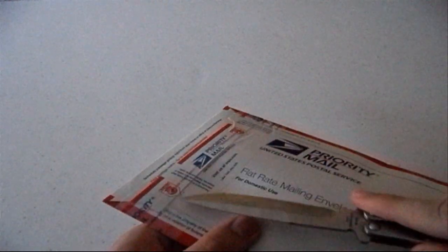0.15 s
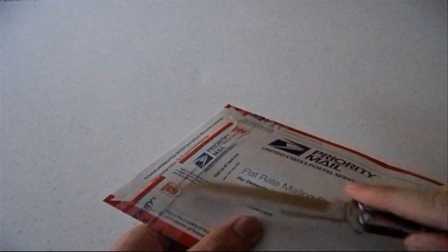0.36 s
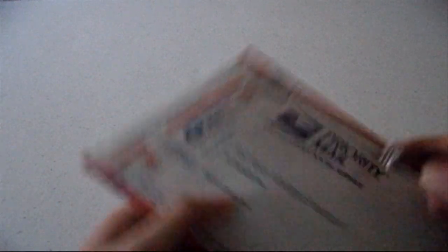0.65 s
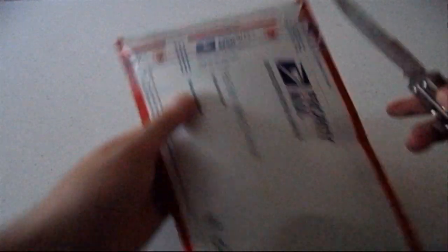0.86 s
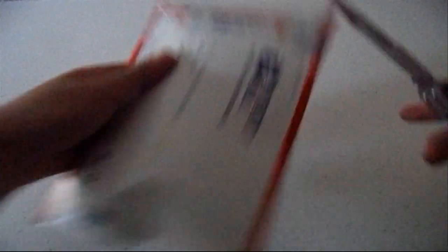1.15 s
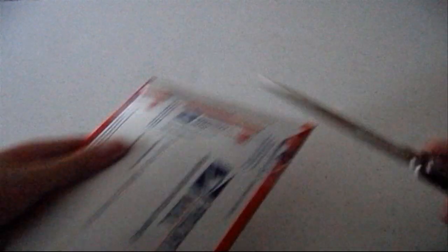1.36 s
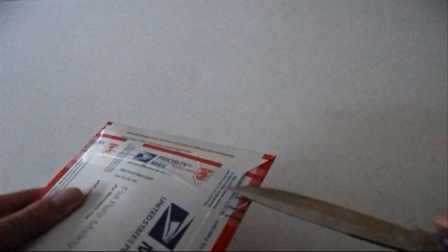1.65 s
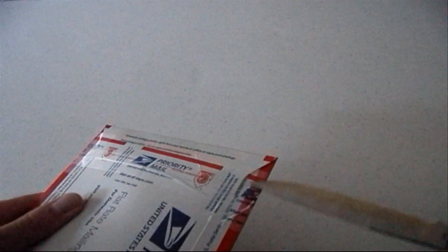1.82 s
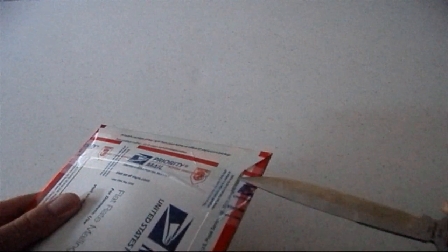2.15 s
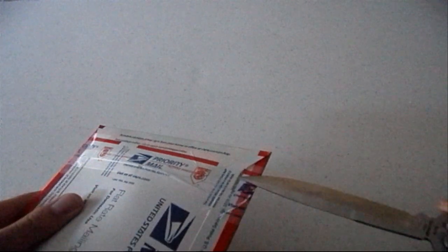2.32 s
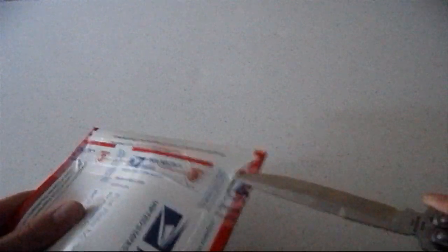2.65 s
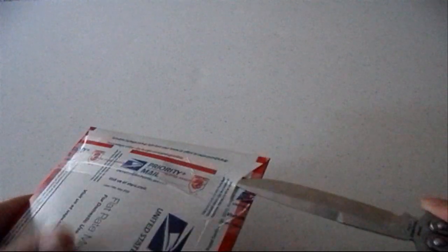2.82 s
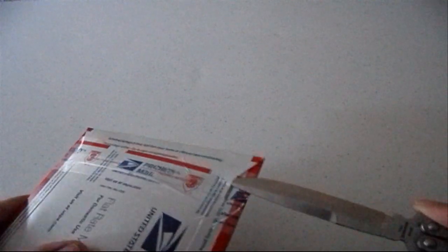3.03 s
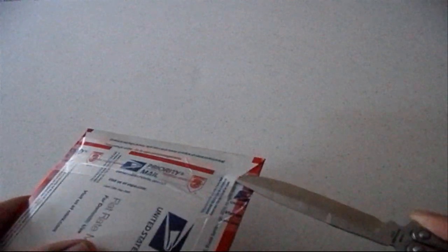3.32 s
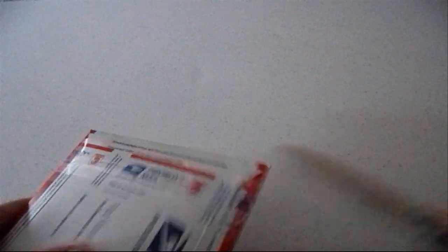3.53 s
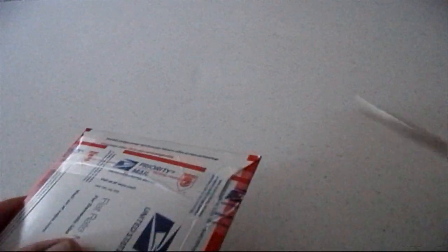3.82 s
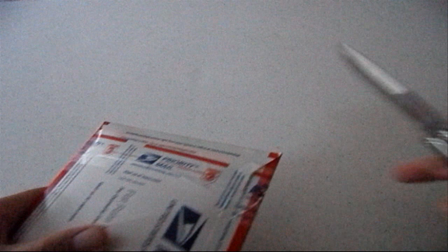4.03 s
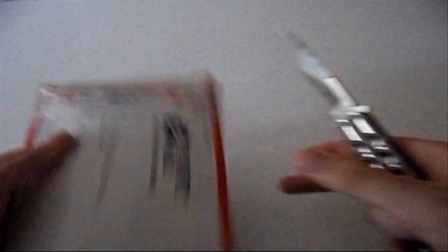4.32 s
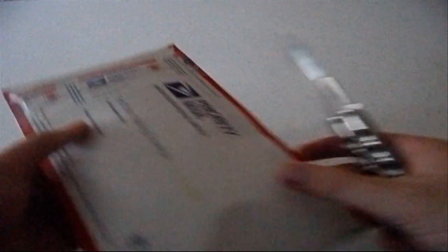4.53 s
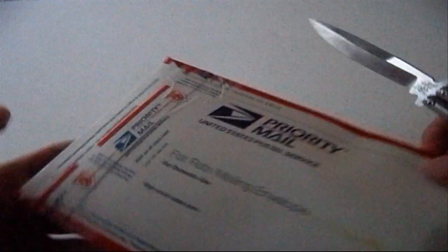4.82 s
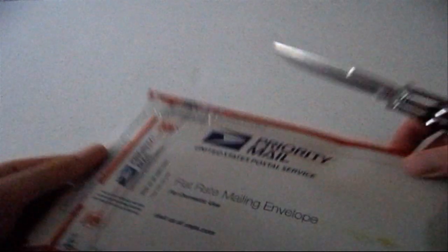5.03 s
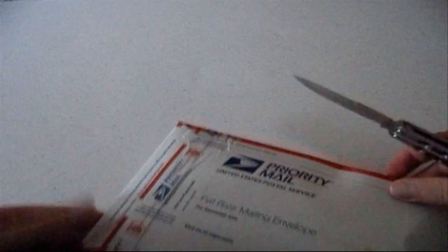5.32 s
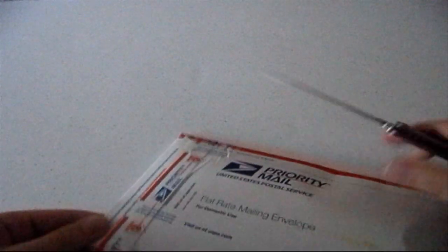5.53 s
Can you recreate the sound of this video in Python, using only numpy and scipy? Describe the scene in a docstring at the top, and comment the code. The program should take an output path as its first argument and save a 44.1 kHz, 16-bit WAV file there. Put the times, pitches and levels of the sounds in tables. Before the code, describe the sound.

Close, lo-fi indoor capture with constant hush and low hum. Paper panels snap, then a knock and a rapid weakening metallic clatter. Sparse scrapes and dull pops as a blade works through the paper, a rapid four-snap rip, a metal click, and finally crinkling with several loud, dry pops and another clack.

```python
"""Small room, paper envelope: a stiff mailer is picked up from a table, cut with a folding knife, turned over.
Buckling panels snap as short damped sines with a noise crack; the blade rasps as dense ticks of tearing fibres.
A table knock rings hollow modes, then the loose metal handle rocks to rest in evenly timed, weakening clacks.
Hush and hum lie under it all. A slow 8-bit converter holds each step, adding a gritty mirror image in the treble."""
import sys
import numpy as np
from scipy import signal
from scipy.fft import rfft, irfft
from scipy.io import wavfile

SR = 44100
rng = np.random.default_rng(int(sys.argv[2]) if len(sys.argv) > 2 else 0)


def output_pcm(signal):
    """Save a mono or channel-first signal as 16-bit PCM at the path in sys.argv[1].

    Samples are clipped to [-1, 1] before scaling.
    """
    pcm = np.clip(np.atleast_2d(signal).T, -1, 1) * 32767
    wavfile.write(sys.argv[1], SR, np.round(pcm).astype(np.int16))


N = 249606
T = np.arange(SR // 2) / SR  # time axis of one event, s

# Hush spectrum. Each row: frequency in Hz, relative density in dB per Hz.
HUSH_SPECTRUM = [(20, -21.5), (60, -18.5), (140, -5.5), (250, 2), (450, -1), (800, -3.5), (1050, -5),
                 (1400, -9.5), (2200, -9.5), (3800, -17.5)]
# Hum partials. Each row: frequency in Hz, rms level in dB.
HUM_PARTIALS = [(119, -62), (238, -63.5)]
# Room decay. Each row: frequency in Hz, T60 in seconds.
ROOM_DECAY = [(150, 0.28), (600, 0.34), (1200, 0.36), (3500, .26)]
# Sound thrown back by the walls. Each row: frequency in Hz, relative level in dB.
WALL_SPECTRUM = [(150, 0), (380, 4), (1050, -0.5), (1650, -2.5), (2400, -3), (3500, -2)]
# Single clicks of the handle. Each row: start in seconds, relative level in dB.
HANDLE_CLACKS = [(.392, -35), (2.796, -31.5), (4.135, -21.5), (5.248, -14.5)]
# Metal modes of the handle. Each row: frequency in Hz, relative level in dB, T60 in seconds.
HANDLE_MODES = [(1670, -17, 0.071), (2080, -16.5, 0.052), (2518, -5, 0.067), (2560, -10.5, 0.078),
                (2660, -10.5, 0.095), (2810, -4.5, 0.055), (3120, -0.5, 0.052), (3180, -3, 0.033),
                (3470, -17, 0.019)]
# Table top modes. Each row: frequency in Hz, relative level in dB, T60 in seconds.
TABLE_MODES = [(198, -20.5, 0.44), (310, -28, 0.071), (403, -10, 0.19), (470.6, -15.5, 0.59),
               (500, -2, 0.081), (544, -4.5, 0.16), (639.3, 1, 0.2), (955, -17, 0.35), (1197, -20, 0.14)]
# Crack of a crease, also the handle tick. Each row: frequency in Hz, relative density in dB per Hz.
CRACK_SPECTRUM = [(200, -1.5), (700, -4), (1250, 0), (1650, -2.5), (2300, 2.5), (3100, 0), (3600, 2),
                  (4200, -13)]
# Buckles of the sheet. Each row: start in seconds, relative level in dB, panel pitch in Hz,
# ring T60 in seconds, relative body level in dB, relative crease level in dB.
SHEET_SNAPS = [(.611, -27.5, 810, 0.015, -5.5, 2.5), (.711, -21, 620, 0.011, -10, 10.5),
               (.715, -17.5, 1200, 0.013, 1.5, 4.5), (.769, -6, 990, 0.016, -8.5, 2),
               (.8676, -6, 900, 0.014, -2, 2.5), (.874, -13.5, 936, 0.011, -6.5, 6.5),
               (1.774, -13.5, 897, 0.0054, -4, -3), (1.877, -23, 975, 0.015, -13, -3),
               (2.216, -20, 728, 0.013, -7.5, -12), (2.22, -24, 282, 0.029, -14, -15),
               (2.511, -3.5, 912, 0.012, -15, -30), (2.826, -13, 816, .013, 0, -6),
               (2.939, -23.5, 760, .018, 3, -7.5), (4.127, -18.5, 1140, 0.0034, -13, 1.5),
               (4.134, -19, 862, 0.015, -0.5, 9.5), (4.306, -10.5, 865, 0.025, -9.5, -5.5),
               (4.357, -22.5, 980, 0.0055, -6, 1.5), (4.408, -24.5, 980, .012, -10.5, 0),
               (4.484, -30.5, 910, 0.012, 1.5, 7), (4.627, -21, 996, 0.0095, -22, 4),
               (4.652, -26, 1080, .013, -10, 2.5), (4.686, -26, 1044, 0.033, -13, 7),
               (4.806, -17, 1010, 0.0097, -4.5, -11), (4.966, -22, 925, 0.0058, -2.5, -3),
               (5.017, -31, 1023, 0.023, -3, 9), (5.212, -26, 1096, .014, -17, 0),
               (5.2484, -7.5, 850, 0.009, -4.5, 3.5), (5.340, 1, 856, 0.0069, -10, -8),
               (5.384, -21, 933, 0.017, -6, 5), (5.4495, -24.5, 930, 0.017, 3, 0.5),
               (5.490, -21, 900, 0.019, -2, 4), (5.526, -4, 966, 0.0059, -9, -4),
               (5.564, -18, 716, 0.019, 7.5, 2), (5.592, -21, 876, .011, 9, 6),
               (5.6445, -11.5, 884, 0.0096, -25, -4)]
# Flexing modes of the whole envelope. Each row: frequency in Hz, relative level in dB, T60 in seconds.
BODY_MODES = [(211, -11.5, 0.022), (290, -3.5, 0.019), (384, -4, .022)]
# Room share of a snap, highest while the envelope is held up. Each row: time in seconds, relative level in dB.
SNAP_ROOM_SHARE = [(.72, -4), (.87, -7), (2.2, -13), (4.3, -11.5), (4.95, -9.5), (5.25, -0.5), (5.34, -6.5),
                   (5.6, -7)]
# Drags of blade and fingers. Each row: peak time in seconds, relative level in dB, swell time constant
# in seconds, fade time constant in seconds, panel pitch in Hz, relative rasp level in dB.
DRAG_STROKES = [(.66, -49.5, 0.061, .048, 873, 3.5), (1.5, -46, 0.033, 0.046, 833, -2),
                (1.886, -31, .006, 0.0096, 977, -5.5), (2.004, -38.5, 0.029, 0.033, 926, -8.5),
                (2.528, -35, .028, 0.027, 995, -7), (2.576, -29, 0.011, 0.017, 904, -1.5),
                (2.703, -23, 0.0099, .02, 1044, -0.5), (3.229, -31.5, .015, 0.017, 803, 4),
                (3.554, -32, .07, .05, 886, 0), (3.547, -19.5, 0.0073, 0.0078, 930, -2),
                (4.557, -40, .01, .022, 995, 1), (4.623, -43, .012, 0.013, 960, 9),
                (4.8, -48, 0.022, 0.047, 1024, 7.5), (5.036, -37, .015, 0.015, 920, -2),
                (5.082, -39.5, 0.019, 0.02, 840, -11), (5.57, -43, 0.11, 0.037, 664, -15)]
# Rasping fibres. Each row: frequency in Hz, relative density in dB per Hz.
RASP_SPECTRUM = [(100, -47), (250, -8.5), (500, -3), (1250, 1), (1600, -8), (2000, -0.5), (2700, 0.5),
                 (3600, 0), (4200, -11)]
# Faint crinkling while the envelope is turned in the hands.
# Each row: start in seconds, end in seconds, mean relative level in dB.
CRINKLE_SPELLS = [(4.45, 5.1, -36.5), (5.35, 5.62, -26.5)]

HUSH_DB = -45
ROCK_START_S, ROCK_PERIOD_S, ROCK_DB, FAR_SIDE_DB = .7748, .02485, -11.5, -0.5
ROCK_HOLD = 1.24  # above 1, the swing keeps up longer before it collapses
KNOCK_S, KNOCK_DB = .769, -8
BURST_S, BURST_DB, BURST_GAP_S, BURST_T60_S = 3.5425, -10, .0064, 0.017
BURST_CRACK_DB, BURST_DULLING_DB, BURST_BODY_DB, BURST_ROOM_DB = 5.5, -2.5, -14, -14
BURST_HZ, BURST_SAG_OCT, BURST_BODY_RISE_DB = 1045, .16, 4.5  # sag and rise per strand
CRINKLES_PER_S, CRINKLE_SPREAD_DB = 16, 4
PANEL_HZ, PANEL_SPREAD_OCT = 932, 0.16
CLOCK_HZ, EDGE_HZ = 8000, 15900  # converter sample rate, upper band edge
STEPS = 128  # from zero to full scale


def amp(db):
    """Decibels to gain."""
    return 10 ** (np.asarray(db) / 20)


def unit(x):
    """Scales to rms 1."""
    return x / np.sqrt(np.mean(x ** 2) + 1e-20)


def read(points, hz):
    """Reads a table on a log-frequency axis."""
    f, value = np.transpose(points)
    return np.interp(np.log(hz + 1), np.log(f + 1), value)


def colour(x, spectrum):
    """Filters a signal by a spectrum, at rms 1."""
    gain = amp(read(spectrum, np.fft.rfftfreq(len(x), 1 / SR)))
    return unit(irfft(rfft(x) * gain, len(x)))


def add(mix, start_s, sound):
    """Mixes a sound in at start_s."""
    part = mix[round(start_s * SR):][:len(sound)]
    part += sound[:len(part)]


def dying(t60_s):
    """Exponential decay, 60 dB down after t60_s."""
    return np.exp(-np.log(1000) * T / np.maximum(t60_s, 1e-3))


def ring(modes, spread_db=0):
    """Damped sines; spread_db varies their strengths with the spot that is struck."""
    out = 0
    for hz, db, t60_s in modes:
        strength = amp(db + spread_db * rng.standard_normal())
        out = out + strength * dying(t60_s) * np.sin(2 * np.pi * hz * T)
    return out


def in_room(x, wet_db, onset_s=0.0028):
    """Adds a diffuse tail of decaying coloured noise, drawn anew for each event."""
    hz, t, z = signal.stft(rng.standard_normal(len(T)), SR, nperseg=256)
    decay = np.exp(-np.log(1000) * t / read(ROOM_DECAY, hz)[:, None])
    z = z * amp(read(WALL_SPECTRUM, hz))[:, None] * decay
    tail = signal.istft(z, SR, nperseg=256)[1][:len(T)]
    tail = tail * (1 - np.exp(-(T / onset_s) ** 2))
    tail = tail / np.linalg.norm(dying(ROOM_DECAY[-1][1]))
    return x + amp(wet_db) * signal.fftconvolve(x, tail)[:len(x)]


def background():
    """Steady coloured noise for the hush, sines for the hum."""
    t = np.arange(N) / SR
    hum = np.zeros(N)
    for hz, db in HUM_PARTIALS:
        hum += amp(db) * np.sqrt(2) * np.sin(2 * np.pi * (hz * t + rng.random()))
    return amp(HUSH_DB) * colour(rng.standard_normal(N), HUSH_SPECTRUM) + hum


def rocking(count=11, far_count=4):
    """Strikes (s, dB) at a steady rate as the swing dies; the first wide swings hit the far side half-way."""
    near = []
    for k in range(count):
        swing = 1 - (k / count) ** ROCK_HOLD
        near.append((ROCK_START_S + k * ROCK_PERIOD_S, ROCK_DB + 20 * np.log10(swing)))
    far = [(s + ROCK_PERIOD_S / 2, db + FAR_SIDE_DB) for s, db in near[:far_count]]
    return near + far


def grip(contact_s=0.0037, rest_db=-6):
    """Parts settling against each other choke much of the metal ring."""
    return amp(np.interp(T, [contact_s, contact_s + 0.0011], [0, rest_db]))


def handle(ring_db=-4.0, tick_db=-7, table_db=-29, wet_db=-12, spread_db=0.6):
    """Metal hits metal: a tick and a short bright ring of random phases, faintly stirring the table."""
    out = np.zeros(N)
    for start_s, db in rocking() + HANDLE_CLACKS:
        tick = colour(rng.standard_normal(len(T)), CRACK_SPECTRUM) * dying(.012)
        metal = np.zeros(len(T))
        for hz, mode_db, t60_s in HANDLE_MODES:
            strength = amp(mode_db + spread_db * rng.standard_normal())
            metal += strength * dying(t60_s) * np.sin(2 * np.pi * (hz * T + rng.random()))
        clack = amp(ring_db) * metal * grip() + amp(tick_db) * tick
        clack += amp(table_db) * ring(TABLE_MODES, spread_db=6)
        add(out, start_s, amp(db) * in_room(clack, wet_db))
    return out


def snap(db, hz, t60_s, body_db, crease_db, wet_db, give_s=0.00027, body_give_s=.0014,
         crack_t60_s=0.011, crack_db=-4, overtone=1.22, overtone_db=-11):
    """A panel flips over: the crease cracks, the panel rings briefly, the whole envelope follows."""
    panel = -2 * ring([(hz, 0, t60_s), (hz * overtone, overtone_db, t60_s)])
    panel = panel * (1 - np.exp(-T / give_s)) ** 2
    body = ring(BODY_MODES) * (1 - np.exp(-T / body_give_s))
    crack = colour(rng.standard_normal(len(T)), CRACK_SPECTRUM) * dying(crack_t60_s)
    dry_snap = panel + amp(body_db) * body + amp(crease_db + crack_db) * crack
    return amp(db) * in_room(dry_snap, wet_db)


def snaps():
    """The listed buckles of the sheet, each with the room share of its moment."""
    out = np.zeros(N)
    for start_s, db, hz, t60_s, body_db, crease_db in SHEET_SNAPS:
        wet_db = np.interp(start_s, *np.transpose(SNAP_ROOM_SHARE))
        add(out, start_s, snap(db, hz, t60_s, body_db, crease_db, wet_db))
    return out


def strokes(fibres_per_s=2900, uneven_db=3.0, width_hz=300, wet_db=-9):
    """Fibres of uneven strength catch and let go; each tick is heard directly and also shakes the panel."""
    out = np.zeros(N)
    t = T - T[-1] / 2  # zero at the peak
    for peak_s, db, swell_s, fade_s, hz, rasp_db in DRAG_STROKES:
        strength_db = uneven_db * np.minimum(rng.exponential(1, len(T)), 4)
        size = rng.choice([-1, 1], len(T)) * amp(strength_db)
        ticks = size * (rng.random(len(T)) < fibres_per_s / SR)
        mode = np.exp(-np.pi * width_hz * T) * np.cos(2 * np.pi * hz * T)
        panel = unit(signal.fftconvolve(ticks, mode)[:len(T)])
        rasp = amp(rasp_db) * colour(ticks, RASP_SPECTRUM)
        pressure = np.exp(-abs(t) / np.maximum(np.where(t < 0, swell_s, fade_s), 1e-3))
        add(out, peak_s + t[0], amp(db) * in_room(pressure * (panel + rasp), wet_db))
    return out


def table(wet_db=-15, echo_s=0.021, echo_db=-9, echo_t60_s=0.055, held_s=0.07, held_db=-8):
    """A knock rings the table modes and returns from the wall; the hand soon damps the ring."""
    out = np.zeros(N)
    damping_db = np.interp(T, [held_s - .01, held_s + 0.022], [0, held_db])
    knock = ring(TABLE_MODES) * amp(KNOCK_DB + damping_db)
    add(out, KNOCK_S, in_room(knock, wet_db))
    add(out, KNOCK_S + echo_s, amp(echo_db) * knock * dying(echo_t60_s))
    return out


def burst(count=4):
    """The last strands part in turn as the blade bursts out, freeing more sheet: lower, fuller, duller snaps."""
    out = np.zeros(N)
    for k in range(count):
        hz = BURST_HZ * 2 ** (-k * BURST_SAG_OCT)
        body_db = BURST_BODY_DB + k * BURST_BODY_RISE_DB
        crease_db = BURST_CRACK_DB + k * BURST_DULLING_DB
        strand = snap(BURST_DB, hz, BURST_T60_S, body_db, crease_db, BURST_ROOM_DB)
        add(out, BURST_S + k * BURST_GAP_S, strand)
    return out


def crinkles(t60_s=.011, body_db=-5, crease_db=0, wet_db=-4):
    """Small panels of varied pitch flip, one at a random moment in each equal time slot."""
    out = np.zeros(N)
    for start_s, end_s, mean_db in CRINKLE_SPELLS:
        for slot_s in np.arange(start_s, end_s, 1 / CRINKLES_PER_S):
            late, size, pitch = rng.random(3)
            hz = PANEL_HZ * 2 ** (PANEL_SPREAD_OCT * (2 * pitch - 1))
            db = mean_db + CRINKLE_SPREAD_DB * (2 * size - 1)
            add(out, slot_s + late / CRINKLES_PER_S, snap(db, hz, t60_s, body_db, crease_db, wet_db))
    return out


def scene(low_cut_hz=160):
    """Sums the events, cuts their bass, adds the background uncut."""
    events = handle() + snaps() + strokes() + table() + burst() + crinkles()
    low_cut = signal.butter(3, low_cut_hz, "highpass", fs=SR, output="sos")
    return (signal.sosfilt(low_cut, events) + background())[None]


def record(dry, input_hz=3900):
    """A slow 8-bit converter clips, rounds down and holds each sample; the steps mirror the sound upward."""
    soft = signal.sosfilt(signal.butter(4, input_hz, fs=SR, output="sos"), dry[0])
    held_at = np.floor(np.arange(N) * CLOCK_HZ / SR) * SR / CLOCK_HZ  # in output samples
    held = np.interp(held_at, np.arange(N), soft)
    stairs = np.floor(np.clip(held, -1, 1) * STEPS) / STEPS
    edge = signal.firwin(255, EDGE_HZ, window=("kaiser", 7), fs=SR)
    return signal.oaconvolve(stairs, edge, "same")[None]


dry = scene()
out = record(dry)
output_pcm(out)
```